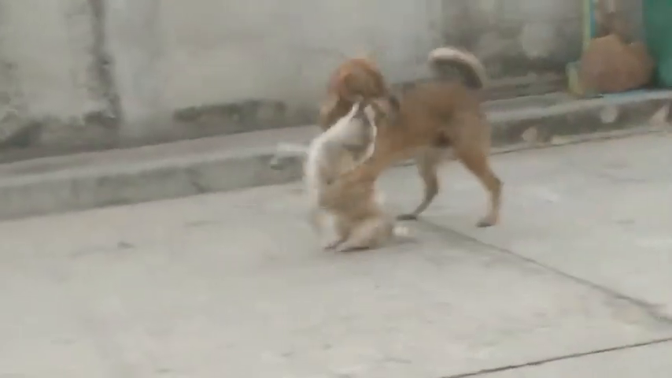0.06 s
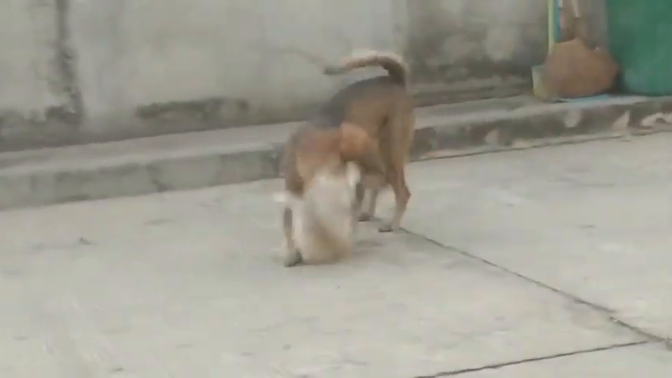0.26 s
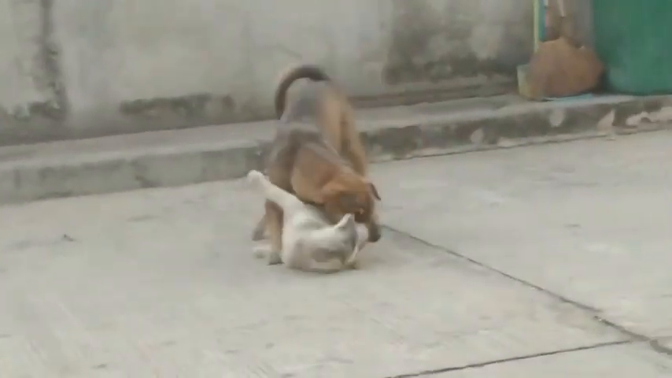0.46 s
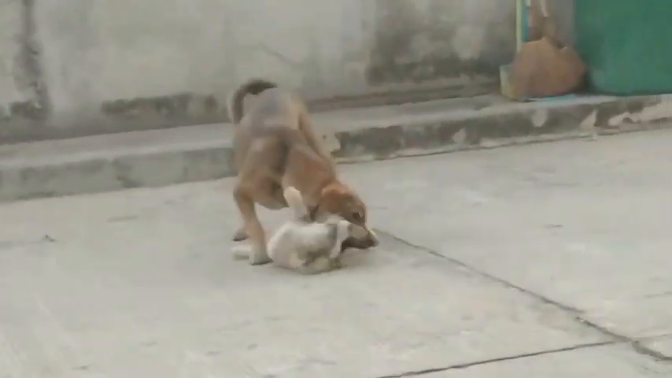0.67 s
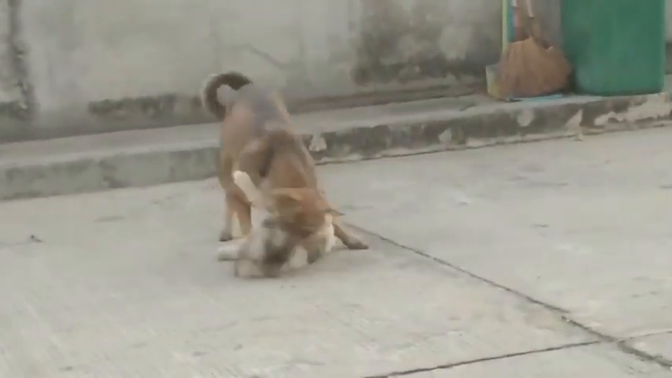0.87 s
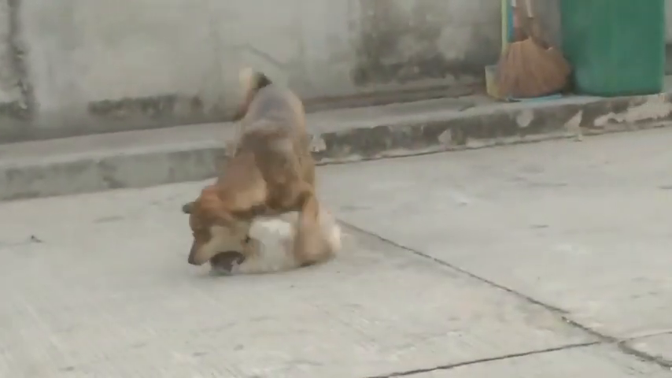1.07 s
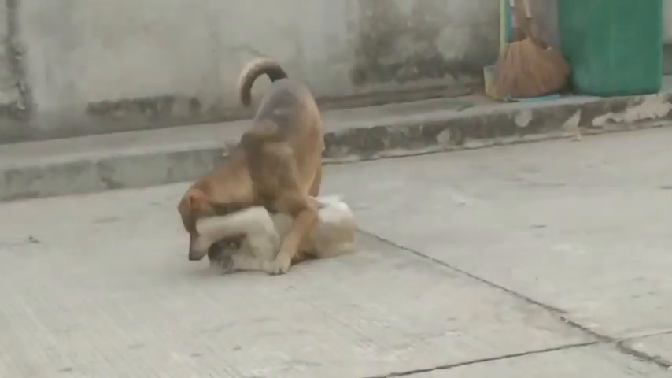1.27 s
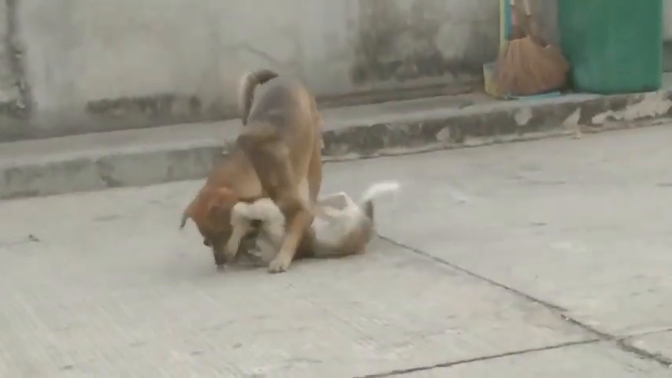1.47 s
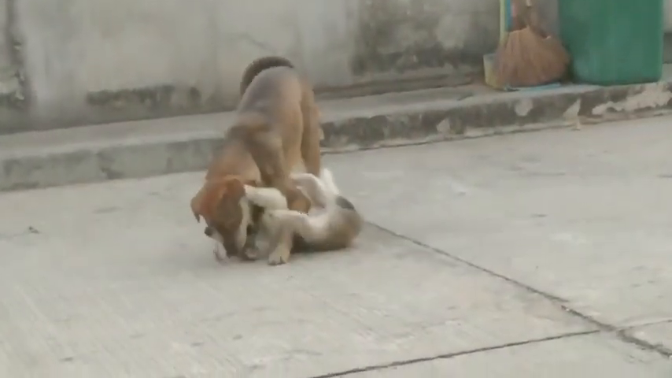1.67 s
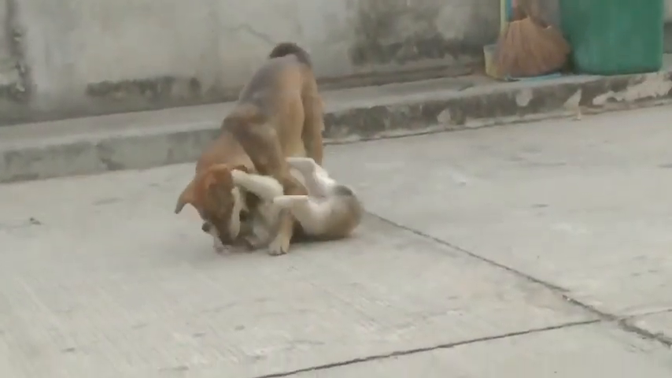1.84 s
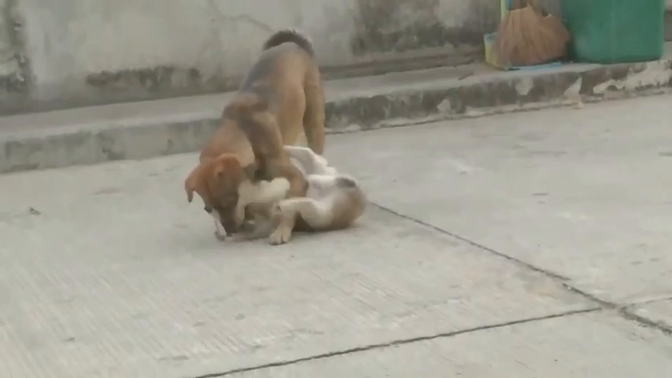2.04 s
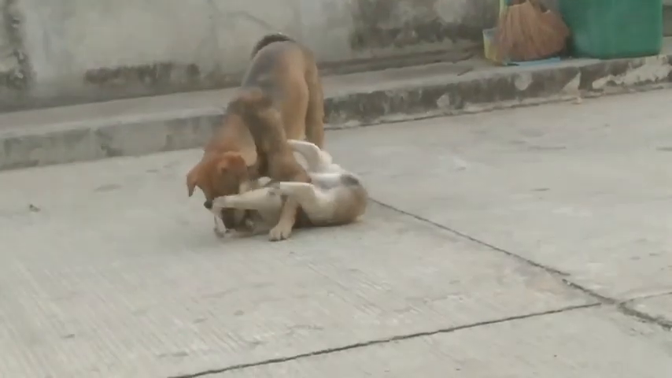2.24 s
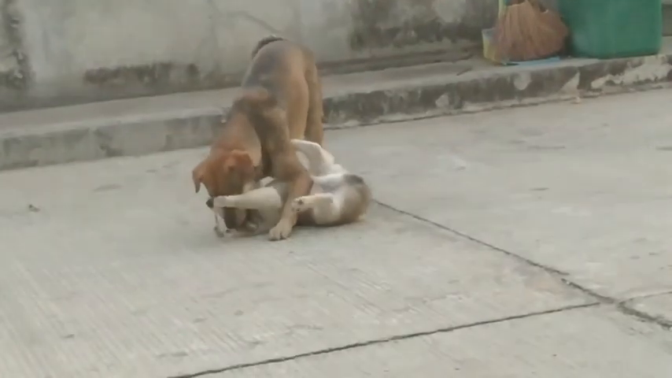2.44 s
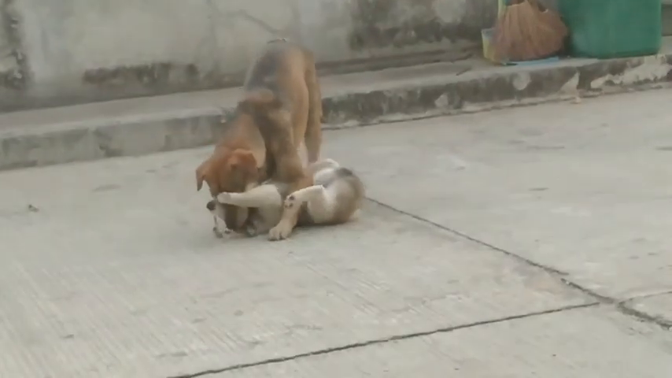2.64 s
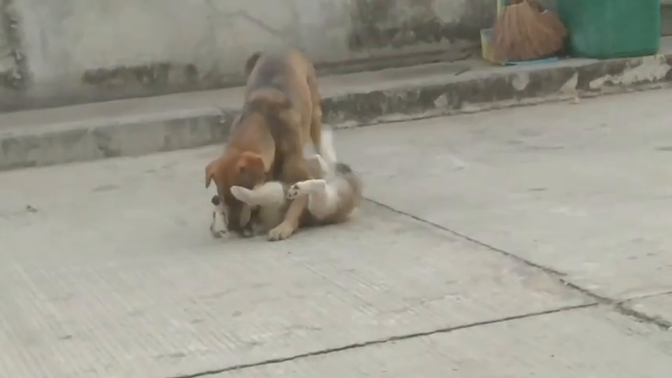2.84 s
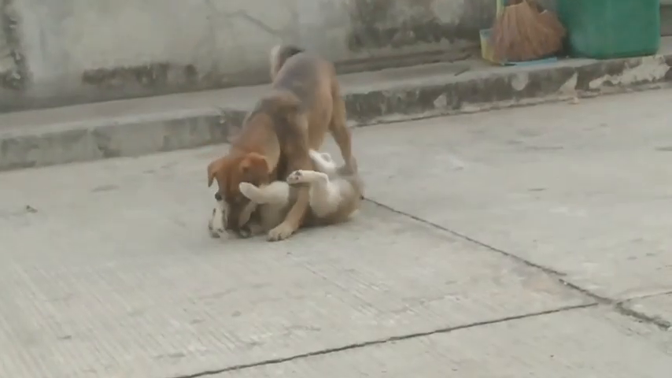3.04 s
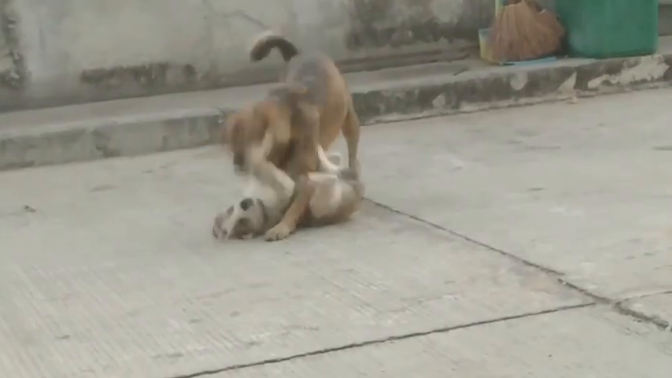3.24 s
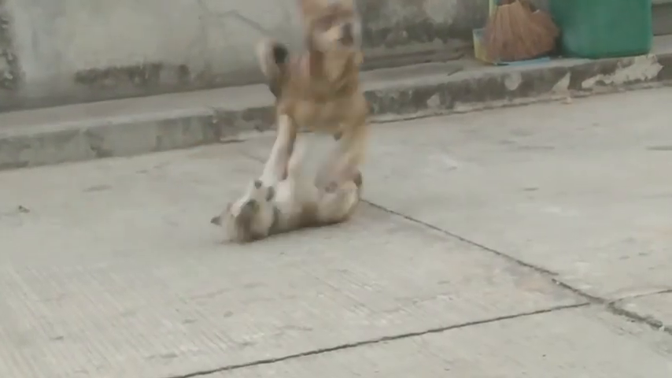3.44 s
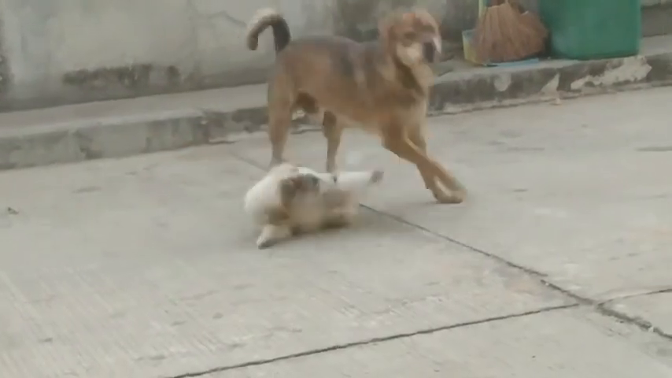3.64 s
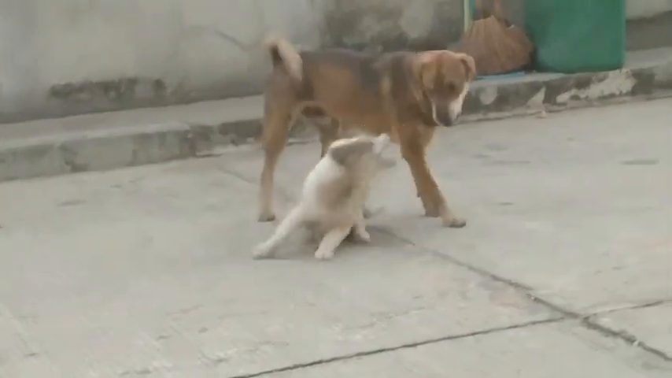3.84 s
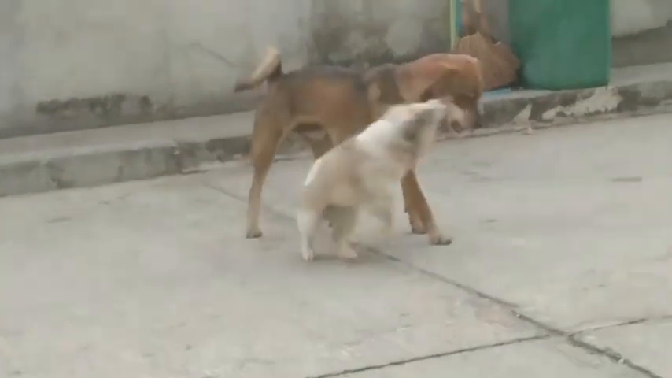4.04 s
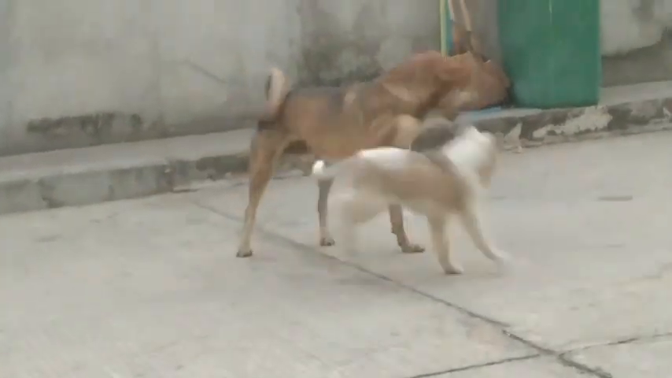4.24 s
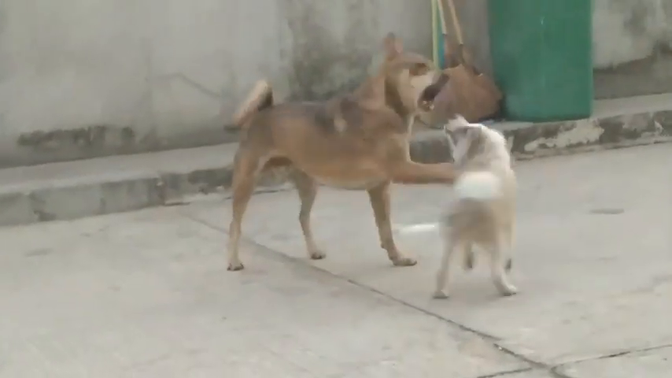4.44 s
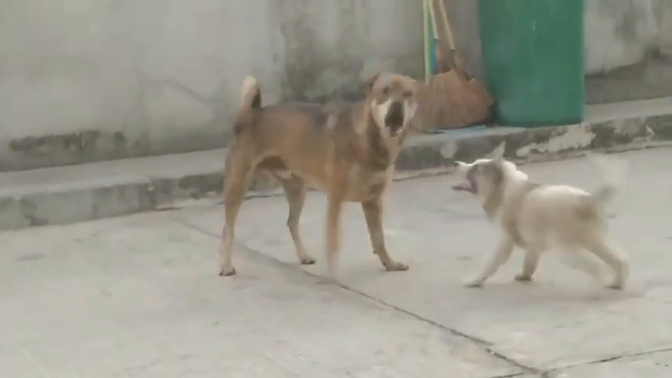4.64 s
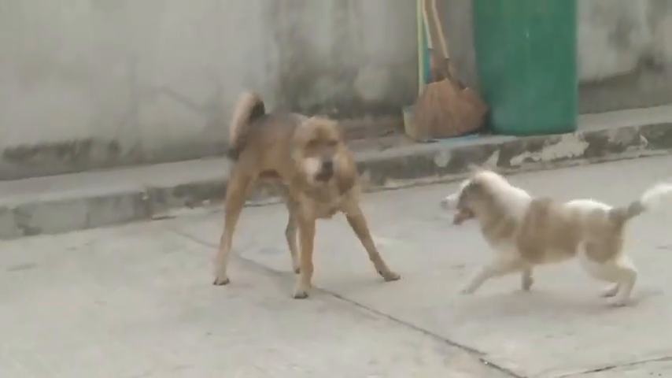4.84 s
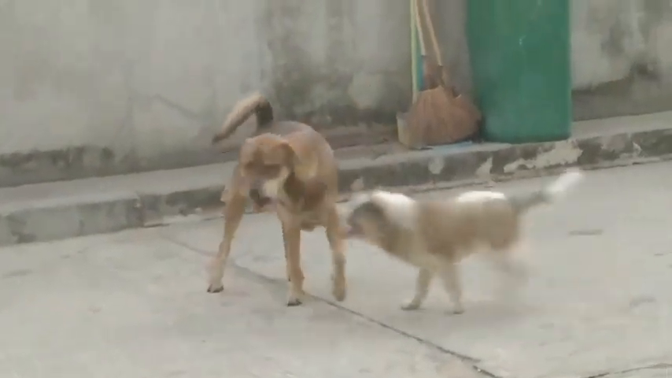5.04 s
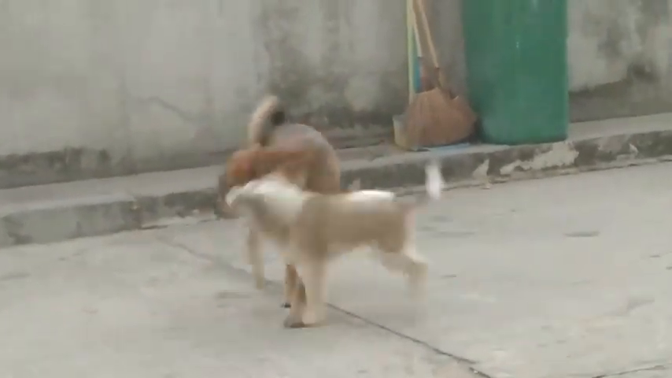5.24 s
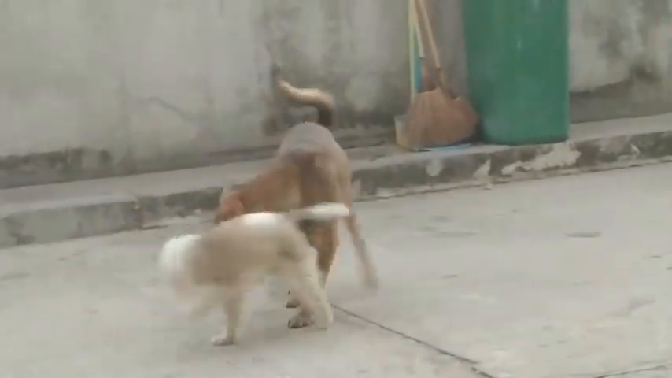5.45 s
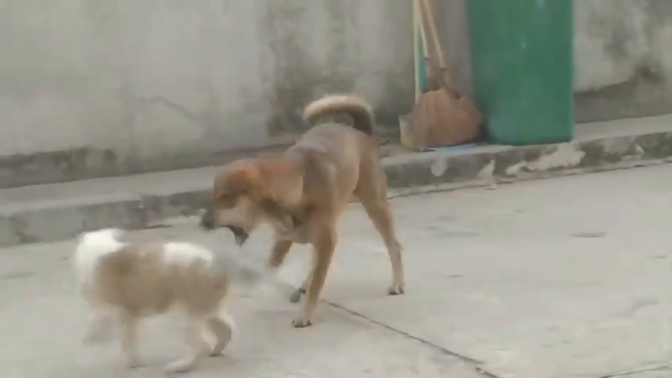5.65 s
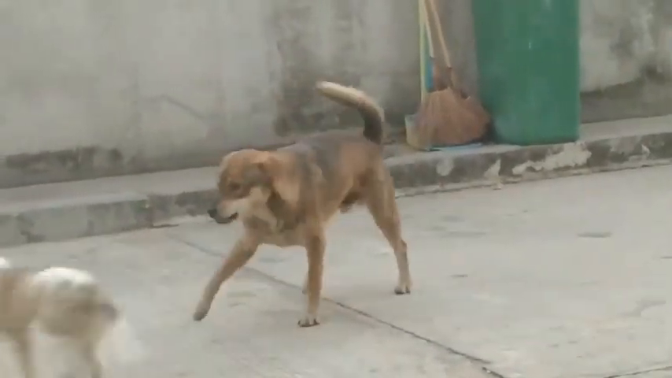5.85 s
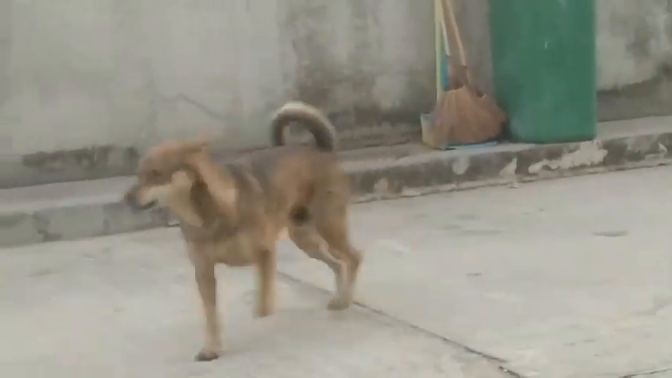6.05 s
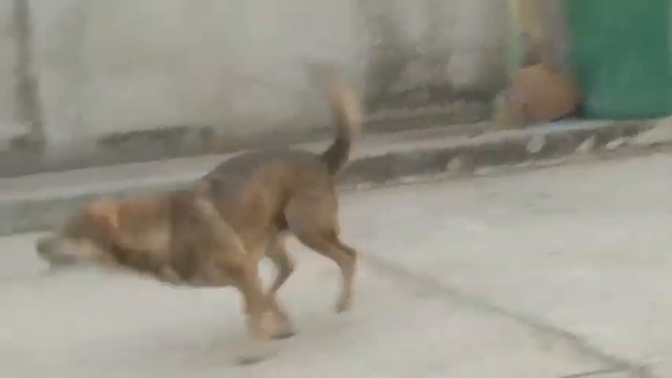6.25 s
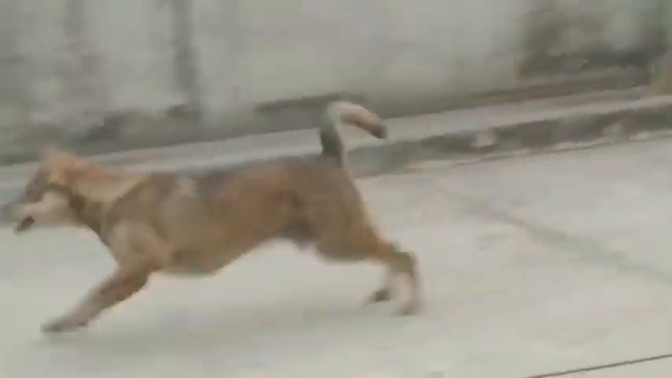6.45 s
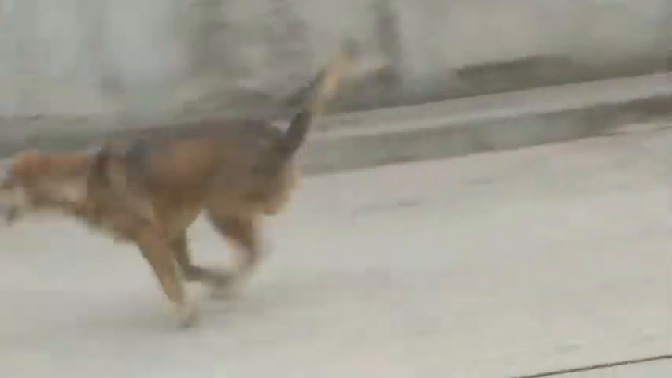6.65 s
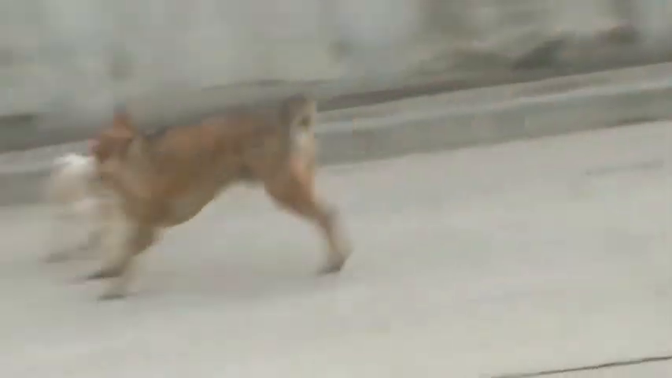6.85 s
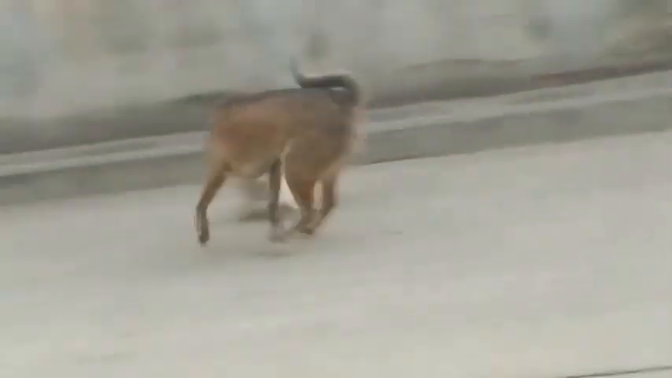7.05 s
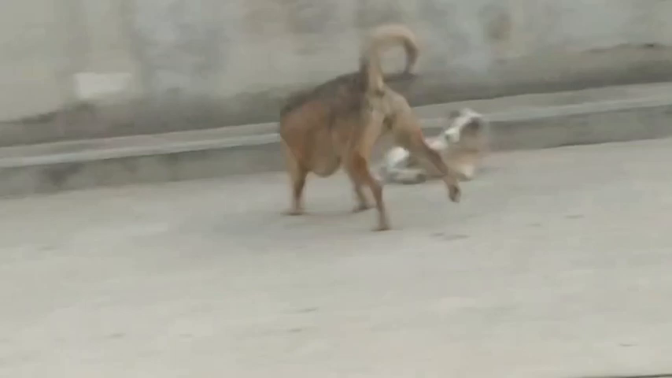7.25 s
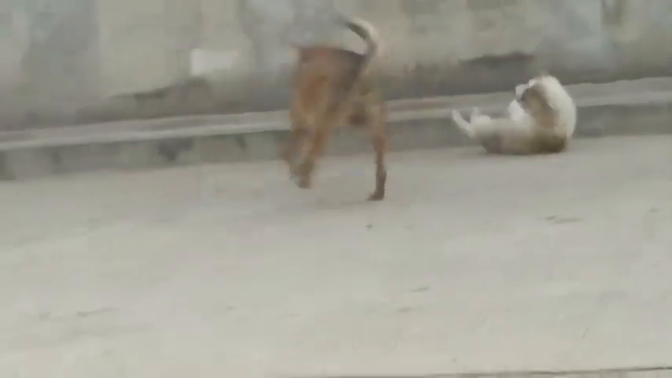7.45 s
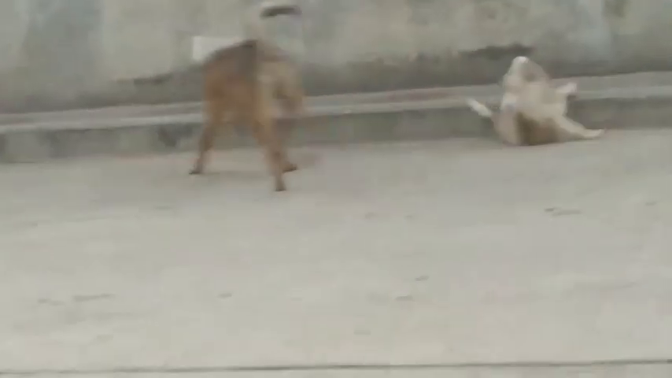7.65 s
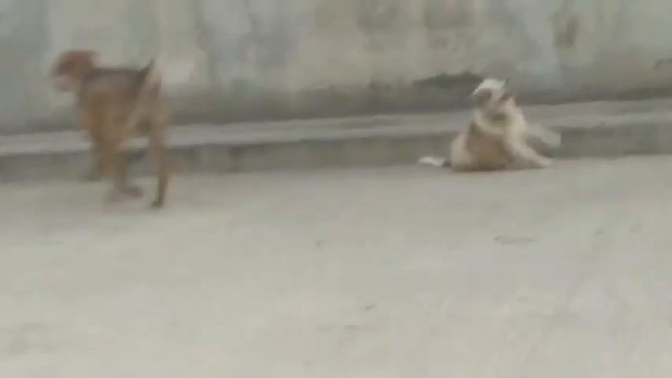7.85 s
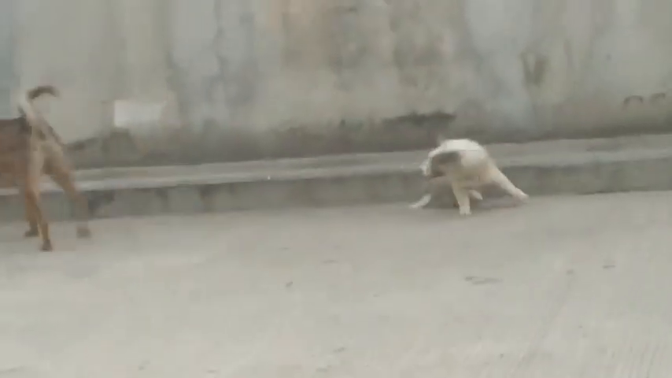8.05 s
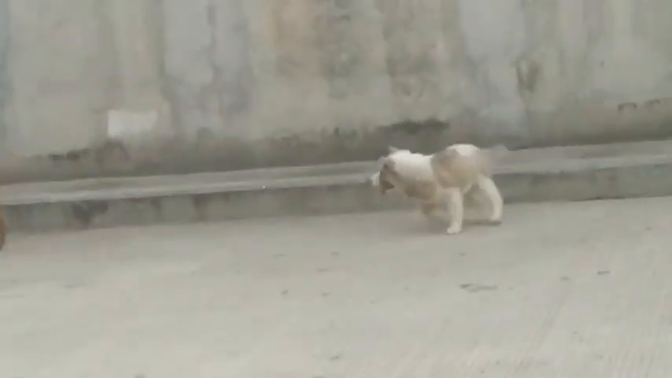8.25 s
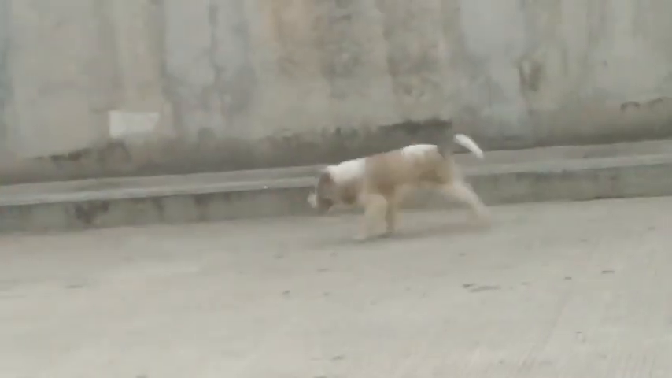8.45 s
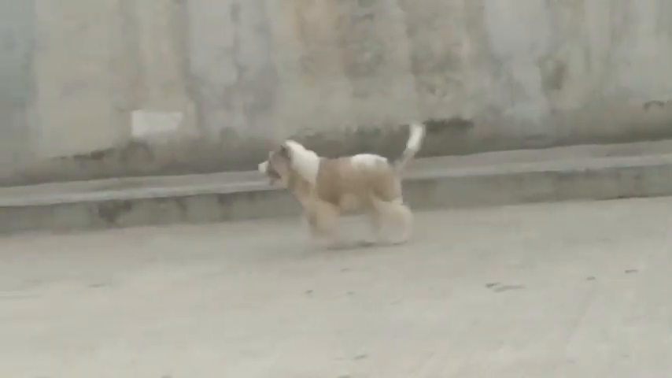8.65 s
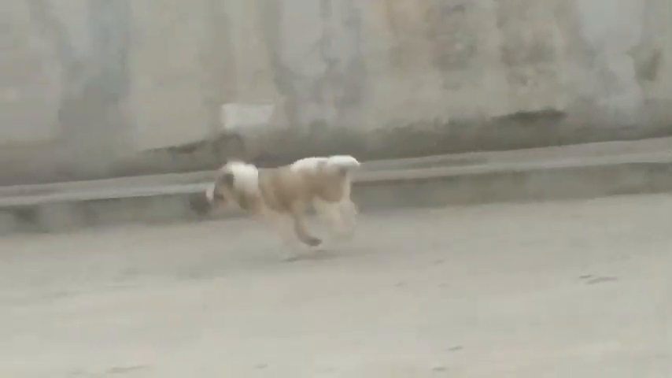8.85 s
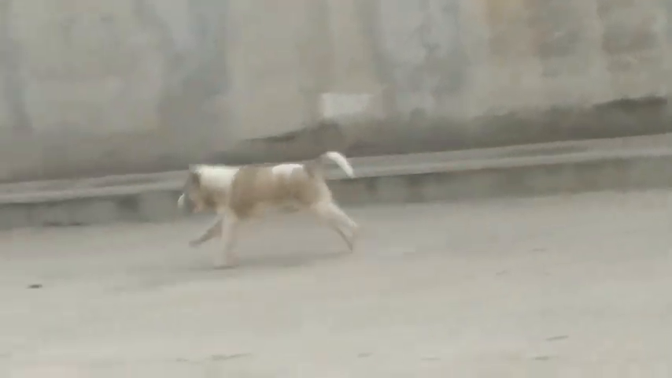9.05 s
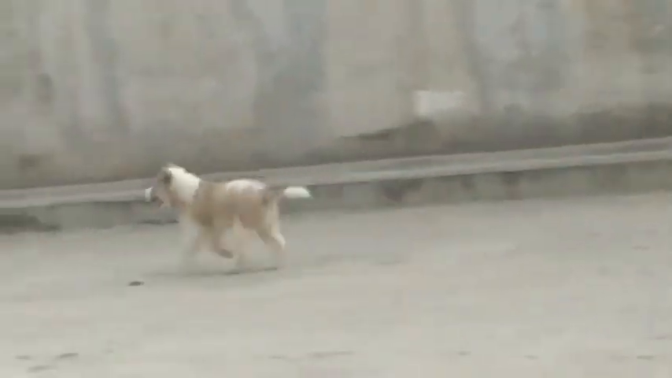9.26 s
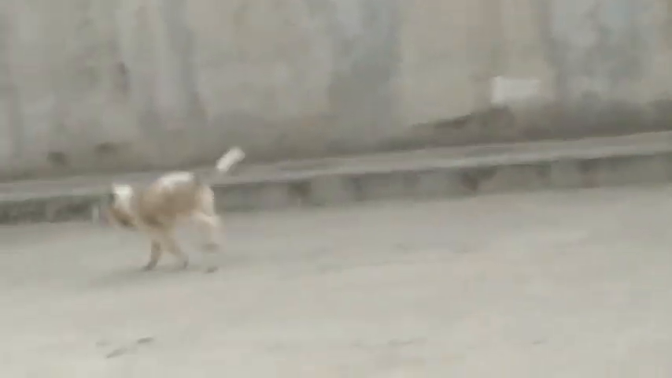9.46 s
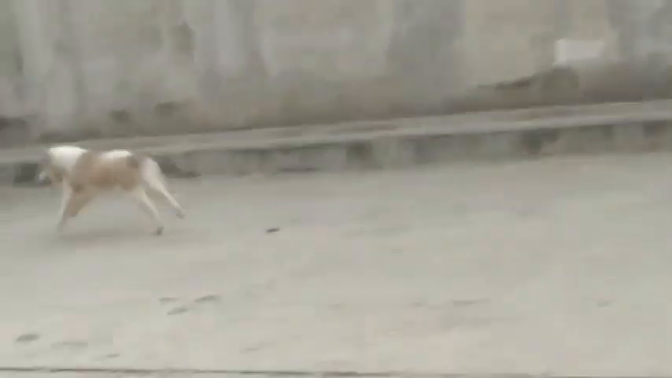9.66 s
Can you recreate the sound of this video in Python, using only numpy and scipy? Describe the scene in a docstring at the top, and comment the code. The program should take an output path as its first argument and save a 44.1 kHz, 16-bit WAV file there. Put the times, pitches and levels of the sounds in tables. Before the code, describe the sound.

A puppy whines, yelps and grunts while wrestling a bigger dog on concrete, with panting, scrabbling claws and one hard jaw snap.

```python
"""A concrete yard between walls: two dogs wrestle and chase a few metres from the microphone.
The pup whines, yelps and grunts as harmonic stacks; panting is noise through resonances.
Claws scrape and tick as filtered noise, paws and fur rub, and jaws snap once as ringing cracks.
The walls throw back voices, claws and, faintly, the snap, over a faint street hum of drifting noise."""
import sys
import numpy as np
from scipy import signal
from scipy.fft import irfft
from scipy.io import wavfile
from scipy.ndimage import uniform_filter1d

SR = 44100
rng = np.random.default_rng(int(sys.argv[2]) if len(sys.argv) > 2 else 0)


def master(y):
    """Save y as 16-bit WAV."""
    cut = np.clip(np.atleast_2d(y).T, -1, 1)
    pcm = np.round(cut * 32767)  # scale
    wavfile.write(sys.argv[1], SR, pcm.astype(np.int16))


def linear_from_db(decibels):
    """Turn decibels (scalar or array-like) into linear amplitude factors; 0 gives 1."""
    return 10 ** (np.asarray(decibels, float) / 20)


N = 428211  # length [samples]

# Street hum, relative spectrum: (frequency [Hz], density [dB per Hz])
HUM_SPECTRUM = [(12, -29.5), (20, -2), (41, 0), (200, -11), (237, -12), (505, -21), (565, -14),
                (650, -20.5), (1600, -20), (2360, -18), (5340, -41.5), (8130, -41.5), (12000, -44.5),
                (15100, -35.5), (16400, -46.5)]
HUM_DB = -60  # level [dB] to which the course below is added
# Course of the hum's level, dipping briefly after the snap: (time [s], level [dB])
HUM_COURSE = [(0, 7.5), (.9, 1), (0.979, 0), (1.01, 3), (3, 5), (4, 0.5), (7.5, 3.5), (9.71, -0.5)]
# Extra swell of the hum's lowest part: (time [s], level [dB])
RUMBLE = [(0, -1.5), (5.1, 0.5), (5.2, 5.5), (5.702, 3), (5.898, -0.5), (9.71, -1)]
# Decay of the yard's tail: (frequency [Hz], fall by 60 dB [s])
YARD_DECAY = [(250, 1), (1200, 0.7), (2500, 0.79), (5000, 0.75), (12000, 0.59)]
# Single wall echoes, the last from a far wall: (delay [s], level [dB])
WALL_ECHOES = [(.011, -17.5), (.019, -10), (.034, -20.5), (0.067, -16.5), (.095, -18), (.125, -21),
               (.69, -41.5)]
# Colour of bright sound at the microphone: (frequency [Hz], density [dB per Hz])
MIC_COLOUR = [(590, -39.5), (1000, -7), (1280, -15), (1400, -9.5), (1520, -18), (2310, 14.5), (4210, -2),
              (5570, -13), (8360, 1.5), (10400, -5), (12000, -8.5), (14800, 3), (16000, -13)]
# Paws and fur rubbing: (time [s], level [dB])
RUBBING = [(0, -58.5), (.45, -63), (.7, -71), (.97, -78), (1.03, -55.5), (1.4, -75.5), (2.1, -62),
           (2.3, -76), (2.75, -58), (3.1, -70.5), (5.7, -75), (6.499, -67.5), (7.3, -64.5), (7.8, -68),
           (9.71, -83.5)]
# Claws dragged on concrete: (time [s], level [dB], length [s])
SCRAPES = [(0.075, -49, 0.031), (0.194, -65, 0.015), (0.267, -56, 0.039), (0.39, -63, 0.05),
           (0.487, -60.5, 0.032), (1.042, -51, 0.048), (2.922, -54, 0.028), (3.313, -48.5, 0.099),
           (3.776, -66, 0.073), (4.285, -61, 0.092), (4.674, -53, 0.06), (4.811, -59.5, 0.054),
           (4.977, -50, 0.044), (5.667, -51.5, 0.054), (5.733, -55, 0.025), (6.215, -63, 0.05),
           (6.341, -55.5, 0.037), (6.42, -50.5, 0.049), (6.683, -66, 0.028), (6.772, -53, 0.027),
           (6.855, -49, 0.047), (7.206, -43, 0.02), (7.626, -66, 0.092), (8.066, -53, 0.026),
           (8.326, -61, 0.019), (8.409, -54, 0.03), (8.67, -52.5, 0.022), (9.125, -62.5, 0.026),
           (9.577, -62, 0.029), (9.682, -55.5, 0.021)]
# Single claw tips: (time [s], level [dB], mid band relative to treble [dB])
TICKS = [(0.2289, -30, -8), (0.248, -37, -10), (0.2752, -38, 5), (1.0864, -32.5, -23), (3.8372, -42, -12),
         (4.6997, -42, -8), (4.8938, -36.5, -7), (4.9841, -40, -20), (5.1711, -43, -2), (5.6795, -36, -4),
         (5.7738, -35, -6), (5.8087, -39, -7), (5.9155, -40.5, -6), (6.0332, -41, -12), (6.2387, -42, -11),
         (6.4248, -32, -17), (6.4398, -30.5, -15.5), (6.4544, -32.5, -19.5), (7.9818, -48.5, -10),
         (8.0162, -36, 7.5), (8.088, -32.5, 1.5), (8.4896, -40, 9), (8.6787, -40.5, -2), (8.8857, -45, -10),
         (9.2848, -42, -17), (9.3681, -43, -11)]
TICK_BODY_DB, SCRAPE_BODY_DB = -12.5, -9  # mid band of faint ticks and of scrapes, relative to treble
FAINT_COUNT = 14  # faint ticks at chance moments
FAINT_TICK_DB, FAINT_SPREAD_DB = -53, 8  # middle and full range of their levels
# Teeth meeting: (time [s], level [dB], crack relative to ring [dB], brightness of ring [dB per octave])
TEETH_CONTACTS = [(0.8903, -35, -8, 11), (0.8916, -31.5, 13, -8), (0.8923, -31.5, -28, 42),
                  (0.8953, -13, -8, -21)]
# Ringing modes of the jaw: (frequency [Hz], level [dB], fall by 60 dB [s])
JAW_MODES = [(564, -50, 0.02), (1510, 2, 0.015), (2344, -14.5, 0.017)]
# Puffs of breath: (start [s], length [s], peak [share of length],
# peak level of mouth [dB], of throat [dB], of chest [dB])
PANTS = [(.01, 0.044, 0.36, -54, -78, -74), (.077, 0.025, .3, -45, -72, -49),
         (.1, 0.022, 0.2, -37, -72, -50), (0.131, 0.066, .5, -52.5, -70, -61),
         (0.269, 0.038, .1, -51.5, -56, -70), (.314, .045, 0.11, -71, -54, -46.5),
         (.395, 0.19, 0.079, -73, -56.5, -52.5), (.57, 0.13, 0.65, -62, -58, -55),
         (1.01, 0.14, 0.19, -71, -51, -49.5), (1.16, 0.19, 0.15, -62, -54.5, -49),
         (1.47, 0.19, 0.44, -59.5, -53.5, -51.5), (1.79, 0.061, 0.52, -50.5, -50, -54.5),
         (2.495, 0.047, 0.51, -55, -68, -69), (3.16, 0.098, .5, -52.5, -50.5, -62),
         (3.345, 0.074, 0.5, -44.5, -60, -55), (4.044, 0.1, 0.18, -61.5, -65, -65),
         (4.184, 0.2, 0.36, -57, -62, -66), (4.58, 0.094, 0.35, -54.5, -60.5, -63.5),
         (4.73, 0.18, 0.32, -56.5, -60, -64), (4.976, 0.086, 0.12, -57, -72, -72),
         (5.144, 0.15, 0.87, -47, -56, -64), (5.44, 0.25, 0.15, -47.5, -49.5, -52.5),
         (5.681, 0.09, 0.43, -45, -59.5, -61), (5.8, 0.15, 0.61, -61, -62.5, -64.5),
         (6.788, 0.073, .3, -53, -58, -66), (6.845, 0.066, 0.1, -47.5, -50, -56),
         (6.995, .055, 0.29, -49, -48.5, -56.5), (7.061, .04, 0.51, -24, -33, -70),
         (7.095, 0.12, .3, -30.5, -33.5, -42.5), (7.755, 0.064, 0.22, -72.5, -59.5, -55.5)]
# Level of a puff relative to its peak: at start [dB], at end [dB]
PANT_SHAPE = (-7, -11.5)
# Breath resonances of the mouth: (frequency [Hz], width [Hz], level [dB])
MOUTH = [(1650, 270, 0), (2210, 340, 3), (2634, 470, 5.5), (3600, 4500, -14)]
# Breath resonance of the throat: (frequency [Hz], width [Hz])
THROAT = (1058, 160)
# Breath resonance of the chest: (frequency [Hz], width [Hz])
CHEST = (607, 320)
# Low pushes from the chest: (start [s], length [s], level [dB], pitch at start [Hz], at end [Hz],
# second harmonic relative to the fundamental [dB])
GRUNTS = [(.06, 0.066, -53, 325, 303, -4), (.314, 0.022, -51, 226, 222.3, 3),
          (.396, 0.05, -51, 243.5, 270.5, 11), (.44, 0.14, -61.5, 215, 206, 2.5),
          (7.25, .11, -48, 340.5, 274, -1)]
# Whimpers with a straight pitch glide, the first a faint rising whistle; same columns
WHIMPERS = [(.62, .265, -82, 3690, 4120, -30), (1.293, .14, -48, 692, 602.5, -16),
            (1.42, 0.059, -52.5, 461, 427, -2.5), (1.5, 0.17, -55, 497, 484, 5),
            (3.15, 0.16, -65, 1027, 1008, -16), (5.47, 0.037, -42, 657, 703, -13),
            (8.89, .05, -67, 1450, 1370, -11.5), (9.14, 0.027, -63.5, 1460, 1455, -10.5)]
# Envelope of a grunt: peak [share of length], start and end relative to peak [dB],
# higher harmonics relative to the fundamental [dB]
GRUNT_SHAPE = (0.4, -6, -23, 1)
# Envelope of a whimper, same columns
WHIMPER_SHAPE = (1, -4, -14.5, -8.5)
WHIMPER_ROUGH, GRUNT_ROUGH = .08, .16  # roughness at the loudest moment, 0 clear - 1 hoarse
# Calls with bending pitch: whines, yelps, a growl, whimpers and a thin whistle, one table each:
# (time [s], pitch [Hz], level of the fundamental [dB],
# second harmonic relative to it [dB], higher harmonics relative to it [dB])
BENDING_CALLS = [
    [(1.645, 628, -42, -20, -39), (1.695, 880, -51.5, -25, -4), (1.73, 973, -39.5, -22, -28),
     (1.77, 894, -50.5, -7, -8), (1.81, 824, -50, 12, -25), (1.84, 799, -55, -6, -5),
     (1.93, 768, -48, -16, -17), (1.98, 870, -50, -15, -2), (2.01, 1045, -37, -19, -28),
     (2.04, 1390, -51, -18, -20), (2.075, 1618, -27, -16, -35), (2.105, 1689, -25, -29, -22),
     (2.14, 1685, -25, -14, -36), (2.185, 1756, -29, -18, -24), (2.215, 1676, -47, -7, -38)],
    [(2.405, 1720, -76, -10, -25), (2.415, 1830, -39, -8.5, -12), (2.51, 1880, -37.5, -8, -21),
     (2.53, 1826, -51, 8.5, -5), (2.55, 1835, -41.5, -15, -27), (2.66, 1813, -32.5, -16, -23),
     (2.695, 1831, -37, 6, -15), (2.725, 1776, -25, -14, -24), (2.75, 1699, -21, -10, -20),
     (2.78, 1657, -36, -19, -35), (2.8, 1652, -33, -16, -33), (2.815, 1530, -29.5, -7, -33),
     (2.85, 1504, -50.5, -3, -26), (2.89, 1410, -48, -9, -9), (2.915, 1193, -43.5, -6, -8),
     (2.945, 1022, -40.5, -5.5, -9), (2.98, 995, -57.5, -19, -12), (3.04, 1012, -40.5, -37, -28),
     (3.09, 1020, -55, 2, -13)],
    [(5.345, 1022, -60, 0, -2), (5.36, 990, -48.5, -24, -8), (5.4, 981, -38.5, -21, -10),
     (5.425, 902, -52, -5, -5), (5.46, 701, -47.5, -10, -24)],
    [(7.057, 1128, -28.5, -18, -13), (7.07, 1210, -32.5, -12, -4.5), (7.083, 1226, -13, -21, -13),
     (7.098, 1274, -12.5, -6, -18.5), (7.112, 1238, -26, 3.5, 1), (7.13, 1288, -32, -15, -3)],
    [(7.1, 638.4, -52, 13, 25.3), (7.12, 627, -47, 14, 20), (7.15, 624, -44.5, 20, 8),
     (7.18, 504, -74, 9.9, 13.4)],
    [(1.06, 564, -58, -12, -10), (1.12, 498.4, -47, -1.5, -10), (1.16, 473, -48, 5.5, 3.5),
     (1.2, 469, -52, -8, -20)],
    [(5.53, 509.4, -55, -3, -5), (5.58, 453, -48.5, -6, -14), (5.61, 530, -47, -22, -12),
     (5.635, 540, -70, 0, 0)],
    [(5.82, 2870, -53, -24, -17), (5.86, 2843, -60.5, -18, -17), (5.94, 2917, -60.5, -30, -22),
     (6.1, 2920, -80, -15, -15)],
]
# Roughness of each of these calls at its loudest moment: 0 clear - 1 hoarse
BENDING_ROUGH = [.02, .03, .05, .1, .5, .04, .25, .02]
# Colour of throat and mouth on harmonics from the third up: (frequency [Hz], level [dB])
TRACT = [(700, 0.5), (1050, -4.5), (1500, -15), (2300, -2), (2800, 6), (3250, -7), (3700, -7.5),
         (4150, -21.5), (5400, -17), (7000, -18), (9000, -3.5), (12000, -4)]
ROLL_DB = -13  # per octave of harmonic number, from the third up


def evened(x):
    """Scales to rms 1."""
    return x / np.sqrt(np.mean(x ** 2) + 1e-20)


def read(points, hz):
    """Reads a spectrum on a log-frequency axis."""
    f, value = np.transpose(points)
    return np.interp(np.log(hz + 1), np.log(f + 1), value)


def level_over_time(points, t):
    """Reads a (time, level) table at times t."""
    return np.interp(t, *np.transpose(points))


def add(mix, s, sound):
    """Mixes a sound in at time s."""
    part = mix[round(s * SR):][:len(sound)]
    part += sound[:len(part)]


def unroll(rows, fade):
    """Start time, soft-edged window and the columns of a table at the sample rate."""
    s, *columns = np.transpose(rows)
    t = np.arange(s[0], s[-1], 1 / SR)
    edge = np.clip(np.minimum(t - s[0], s[-1] - t) / fade, 0, 1)
    return s[0], np.sin(edge * np.pi / 2) ** 2, [np.interp(t, s, c) for c in columns]


def wander(count, hz):
    """Smooth chance of rms 1, moving up to hz times a second."""
    noise = rng.standard_normal(count + 4000)
    return evened(signal.lfilter(*signal.butter(2, hz, fs=SR), noise)[4000:])


def resonate(x, hz, width):
    """A steep resonance: one complex pole applied twice, output at rms 1."""
    pole = np.exp((2j * np.pi * hz - np.pi * width) / SR)
    once = signal.lfilter([1], [1, -pole], x + 0j)
    return evened(signal.lfilter([1], [1, -pole], once).real)


def coloured(x, points):
    """Filters x by a spectrum, keeping the level of white noise."""
    gain = linear_from_db(read(points, np.fft.rfftfreq(512, 1 / SR)))
    impulse = np.roll(irfft(evened(gain)), 256) * np.hanning(512)
    return signal.oaconvolve(x, impulse, "same")


def treble(x):
    """The part above 4.5 kHz in the microphone's colour."""
    return coloured(signal.lfilter(*signal.butter(3, 4500, "high", fs=SR), x), MIC_COLOUR)


def arch(start, length, peak, start_db, end_db):
    """Start, peak and end of a short call: times, share of the length, dB relative to the peak."""
    share = np.array([0, np.clip(peak, .05, .95), 1])
    return start + length * share, share, np.array([start_db, 0, end_db])


def hum():
    """Far traffic and wind: random short-time spectra with drifting patches."""
    frames, hz = N // 256 + 5, np.fft.rfftfreq(1024, 1 / SR)
    real, imaginary, patches = rng.standard_normal((frames, 513, 3)).T
    patches = evened(uniform_filter1d(uniform_filter1d(patches, 12, 0), 14, 1))
    rumble_db = level_over_time(RUMBLE, np.arange(frames) * 256 / SR)
    low_db = np.outer(1 / (1 + (hz / 170) ** 4), rumble_db)
    patch_db = 1.5 * patches * (hz / (hz + 800))[:, None]  # the lowest part drifts least
    gain = linear_from_db(read(HUM_SPECTRUM, hz)[:, None] + low_db + patch_db)
    wash = signal.istft((real + 1j * imaginary) * gain, nperseg=1024, noverlap=768)[1][:N]
    return evened(wash) * linear_from_db(HUM_DB + level_over_time(HUM_COURSE, np.arange(N) / SR))


def yard(x, walls_db, tail_db):
    """Direct sound, single echoes from the walls, then a sparse tail dying band by band."""
    taps, echoes = np.zeros(SR), np.zeros(SR)
    at = np.arange(700, SR - 20, 20)
    taps[at + rng.integers(0, 20, len(at))] = rng.choice([-1., 1.], len(at))
    hz, t, z = signal.stft(taps, SR, nperseg=256)
    decay = linear_from_db(-60 * t / read(YARD_DECAY, hz)[:, None])
    tail = signal.istft(z * decay, SR, nperseg=256)[1][:SR]
    for s, db in WALL_ECHOES:
        echoes[round(s * SR)] = linear_from_db(db + walls_db)
    reflections = echoes + linear_from_db(tail_db) * tail / np.linalg.norm(tail)
    return x + signal.fftconvolve(x, reflections)[:N]


def shuffle():
    """Paws and fur rub in uneven strokes: noise with a wandering level."""
    level_db = level_over_time(RUBBING, np.arange(N) / SR)
    rub = rng.standard_normal(N) * linear_from_db(level_db + 3.6 * wander(N, 25) + 1.5 * wander(N, 200))
    return coloured(rub, MIC_COLOUR)


def claws():
    """Scrapes swell and fade as hiss with sparse grit; ticks strike at once and fizz out."""
    scraped, ticked, knocked = np.zeros(N), np.zeros(N), np.zeros(N)
    t = np.arange(8000) / SR
    chance = rng.random((FAINT_COUNT, 2))
    faint = [(c * N / SR, FAINT_TICK_DB + FAINT_SPREAD_DB * (d - .5), TICK_BODY_DB) for c, d in chance]
    ticks = [*TICKS, *faint]
    for s, db, length in SCRAPES:
        a, b, c = rng.random((3, len(t)))
        grit = (a < 350 / SR) * np.log(b + 1e-9) * np.sign(c - .5) * 8.2  # about 350 grains a second
        hiss = 2.7 * (c - .5)
        u = t / length
        add(scraped, s, linear_from_db(db) * (grit + hiss) * np.minimum(u / 0.31, 1) * np.exp(-u ** 4))
    for s, db, body_db in ticks:
        fizz = rng.standard_normal(len(t)) * (0.6 * np.exp(-t / 0.00088) + 0.18 * np.exp(-t / 0.011))
        tick = linear_from_db(db) * (2.3 * (t == 0) + fizz)
        add(ticked, s, tick)
        add(knocked, s, linear_from_db(body_db) * tick)
    body = linear_from_db(SCRAPE_BODY_DB) * scraped + knocked
    mid_band = signal.lfilter(*signal.butter(2, [1300, 3600], "band", fs=SR), body)
    return treble(scraped + ticked) + mid_band


def snap():
    """Teeth clack together: each contact cracks and rings the jaw."""
    out, t = np.zeros(N), np.arange(2000) / SR
    for s, db, crack_db, tilt_db in TEETH_CONTACTS:
        ring = 0
        for hz, mode_db, t60 in JAW_MODES:
            fading_db = mode_db + tilt_db * np.log2(hz / 1500) - 60 * t / t60
            ring = ring + linear_from_db(fading_db) * np.sin(2 * np.pi * hz * t)
        crack = rng.standard_normal(len(t)) * (np.exp(-t / 0.00082) + 0.075 * np.exp(-t / 0.0051))
        add(out, s, linear_from_db(db) * (ring + linear_from_db(crack_db) * (0.46 * crack + 0.95 * treble(crack))))
    return signal.sosfilt(signal.butter(2, [600, 16000], "band", fs=SR, output="sos"), out)


def pant(start, length, peak, *peak_db):
    """Air noise, throbbing with a slack growl, through mouth, throat and chest; it hisses past the teeth."""
    times, _, below_db = arch(start, length, peak, *PANT_SHAPE)
    rows = np.transpose([times, *(db + below_db for db in peak_db)])
    s, edge, (mouth_db, throat_db, chest_db) = unroll(rows, 0.012)
    growl_hz = 100 * (1 + .25 * wander(len(edge), 30))
    growl = np.cos(2 * np.pi * np.cumsum(growl_hz) / SR)
    air = rng.standard_normal(len(edge)) * linear_from_db(0.5 * wander(len(edge), 110) + 4.5 * growl)
    mouth = 0
    for k, (hz, width, db) in enumerate(MOUTH):
        mouth = mouth + (-1) ** k * linear_from_db(db) * resonate(air, hz, width)
    hiss = linear_from_db(-16.5) * treble(air)
    deep = linear_from_db(throat_db) * resonate(air, *THROAT) + linear_from_db(chest_db) * resonate(air, *CHEST)
    return s, edge * (linear_from_db(mouth_db) * (evened(mouth) + hiss) + deep)


def call(row, shape):
    """Control table of a short call: the level arches, the pitch glides straight."""
    start, length, db, first_hz, last_hz, second_db = row
    *envelope, higher_db = shape
    s, share, below_db = arch(start, length, *envelope)
    hz = first_hz + (last_hz - first_hz) * share
    return np.transpose([s, hz, db + below_db, second_db + 0 * s, higher_db + 0 * s])


def voice(rows, rough):
    """Vocal folds: a harmonic stack whose cycles shake in pitch and size as the call gets hoarse."""
    s, edge, (hz, level_db, second_db, higher_db) = unroll(rows, 0.0049)
    count = len(hz)
    loudest = level_db + np.maximum(second_db, 0)
    # weakly driven folds lose their step
    rough = np.minimum(rough * (1 + (loudest.max() - loudest) / 9), .7)
    hz = uniform_filter1d(hz, 300) * (1 + .1 * rough * wander(count, 160) + .003 * wander(count, 22))
    turns, out = np.cumsum(hz) / SR, 0
    shake = np.clip(wander(count, 670), -2, .5)
    for k in range(1, 15):
        if k < 3:
            relative_db = second_db * (k - 1)
        else:
            relative_db = higher_db + ROLL_DB * np.log2(k / 3) + read(TRACT, k * hz)
        # hoarseness smears the high harmonics most
        hoarse_db = 2.13 * k * rough * shake * (k > 3)
        # each harmonic flickers by chance on its own, the higher ones more
        flicker_db = (1.4 * min(k, 3) - .5) * wander(count, 35)
        gain = linear_from_db(level_db + relative_db + hoarse_db + flicker_db) * (k * hz < 15900)
        out = out + gain * np.cos(2 * np.pi * (k * turns + rng.random()))
    return s, np.sqrt(2) * out * edge * linear_from_db(9.7 * rough * wander(count, 120))


def scene():
    """Dogs in the yard over the hum; the snap is nearly dry, hum and rubbing have no echo."""
    dogs = np.zeros(N)
    for row in PANTS:
        add(dogs, *pant(*row))
    for row in GRUNTS:
        add(dogs, *voice(call(row, GRUNT_SHAPE), GRUNT_ROUGH))
    for row in WHIMPERS:
        add(dogs, *voice(call(row, WHIMPER_SHAPE), WHIMPER_ROUGH))
    for rows, rough in zip(BENDING_CALLS, BENDING_ROUGH):
        add(dogs, *voice(rows, rough))
    background = hum() + shuffle()
    struck = yard(claws(), -7.0, -18.0) + yard(snap(), -23.5, -31.0)
    return (background + struck + yard(dogs, 0, -12.0))[None]


def low_pass(x):
    """Removes everything above the highest recorded frequency."""
    return signal.sosfilt(signal.butter(12, 16970, fs=SR, output="sos"), x)


def record(dry):
    """The microphone's band limit at 16.6 kHz."""
    limited = signal.oaconvolve(dry, signal.firwin(255, 16600, fs=SR)[None], "same")
    return low_pass(limited)


dry = scene()
out = record(dry)
master(out)
```